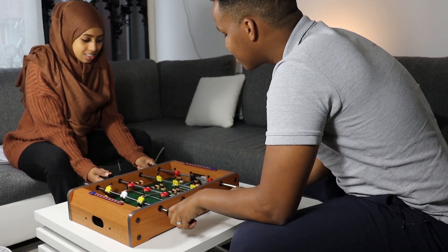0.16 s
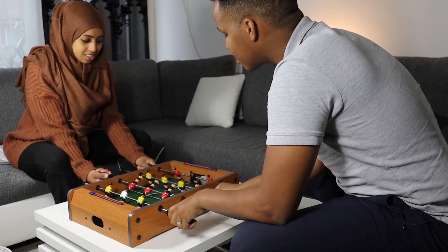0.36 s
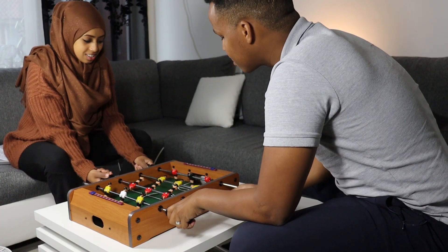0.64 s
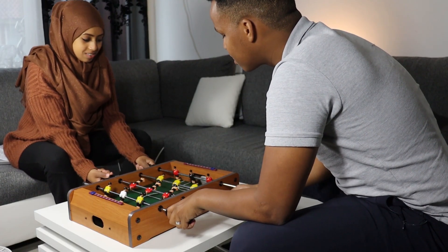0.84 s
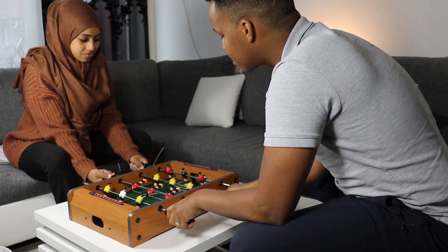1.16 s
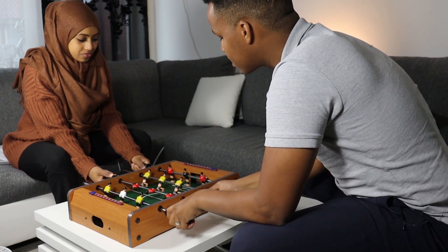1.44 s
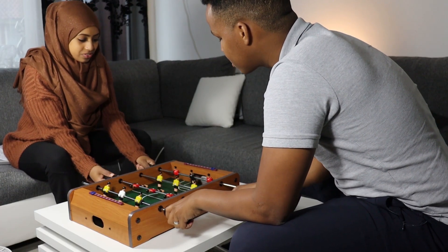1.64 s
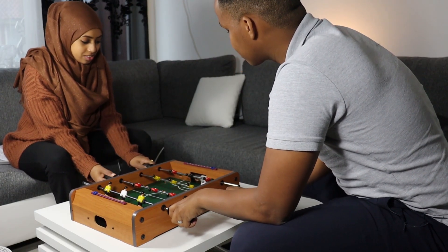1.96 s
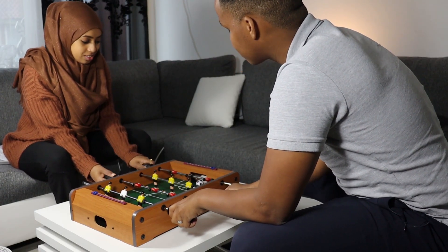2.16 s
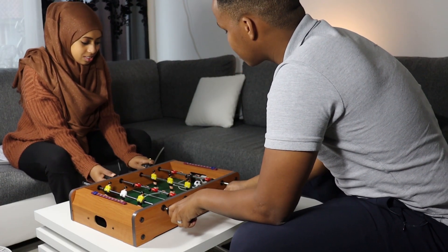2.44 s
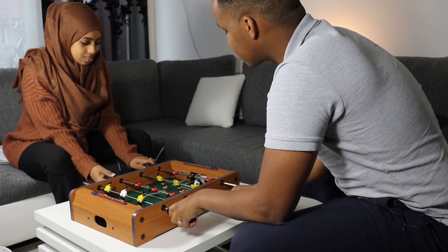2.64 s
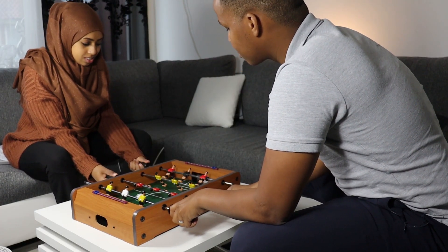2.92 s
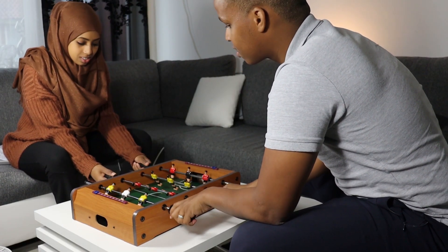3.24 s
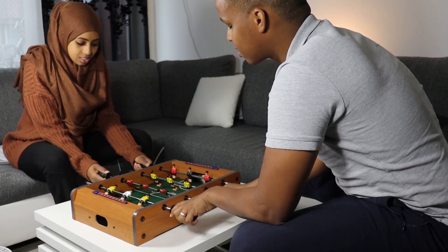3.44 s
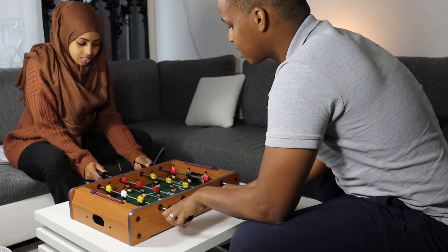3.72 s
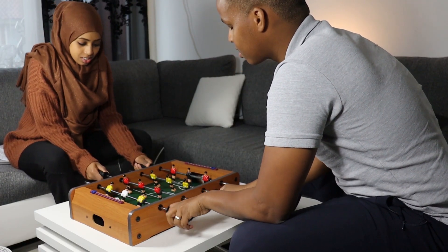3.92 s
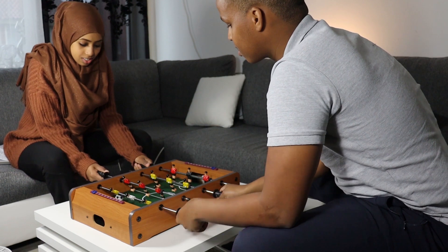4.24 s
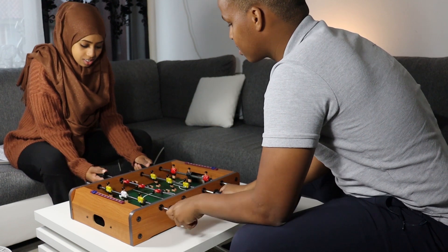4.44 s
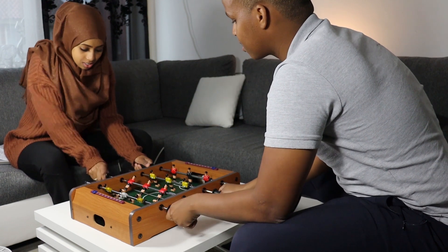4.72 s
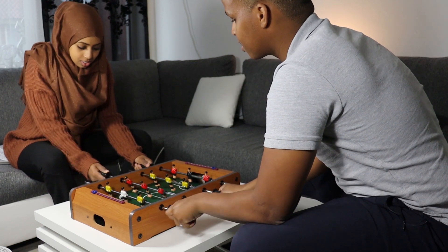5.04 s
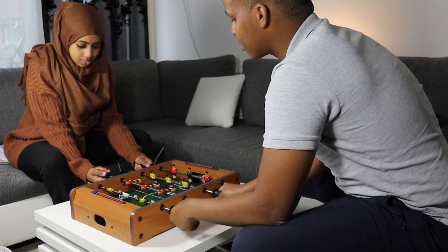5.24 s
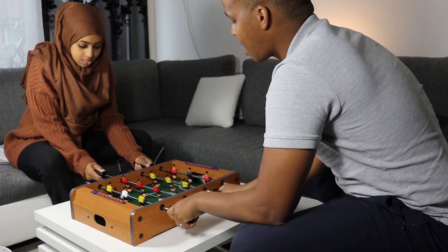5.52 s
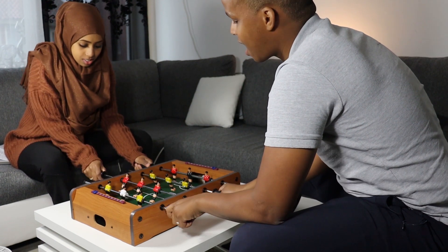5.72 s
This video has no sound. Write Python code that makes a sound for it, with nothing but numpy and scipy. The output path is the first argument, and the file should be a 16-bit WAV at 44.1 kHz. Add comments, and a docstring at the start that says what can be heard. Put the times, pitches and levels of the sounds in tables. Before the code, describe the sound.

Tabletop football played in a furnished living room: hard wooden knocks and clacks, sliding rods, a rattling ball, and long quiet gaps.

```python
"""Furnished living room: a small wooden table-football box on a coffee table, one microphone
a couple of metres off. Ball and rods knock the box, whose modes ring briefly; rods slide and the
ball rolls as dense ticks through the same modes; two rods squeak as gliding tones.
The coffee table rocks as low noise; the room adds a banded noise tail; shaped noise makes
the faint house hum and microphone hiss."""
import sys
import numpy as np
from scipy import signal
from scipy.fft import rfft, irfft
from scipy.io import wavfile

SR = 44100
rng = np.random.default_rng(int(sys.argv[2]) if len(sys.argv) > 2 else 0)


def wav_record(signal):
    """Record a signal, one row per channel, as 16-bit PCM in the file named by sys.argv[1]."""
    frames = np.transpose(np.atleast_2d(signal))
    bounded = np.clip(frames, -1, 1)
    # unit amplitude maps onto the largest positive 16-bit level
    quanta = np.round(bounded * 32767).astype(np.int16)
    wavfile.write(sys.argv[1], SR, quanta)


N = 258728  # samples

# Source levels in the tables are before the balance set in scene().
# Background spectrum: f/Hz, relative density/dB per Hz
AIR_SPECTRUM = [(15, -32), (25, -7), (127, -3), (212, -3.5), (427, -11.5), (503, -11), (1160, -13.5),
                (2000, -19.5), (2910, -15.5), (3160, -19.5), (4490, -21), (14800, -29), (16000, -22.5)]
AIR_LEVEL_DB = -64.5  # rms
# Rumble of the rolling ball and handled rods: t/s, level/dB
ROLLING = [(0, -34.5), (.18, -86), (.42, -57), (.64, -54), (.85, -82.5), (1.06, -58), (1.5, -52.5),
           (1.75, -50), (2.3, -72), (2.66, -56), (2.8, -71.5), (3.55, -57), (3.87, -53.5), (4.2, -61),
           (4.52, -51), (5.15, -57), (5.3, -62), (5.87, -50.5)]
# Rods sliding in their bearings: middle t/s, length/s, rub level/dB, scrape hiss level/dB
SLIDES = [(.03, .2, -47, -74), (.45, .15, -67, -64), (.66, .2, -90, -67), (1.1, .25, -71, -69),
          (1.47, .2, -50.5, -89), (1.83, .12, -43.5, -45.5), (2.2, .2, -48, -83.5), (2.66, .15, -58.5, -64),
          (2.87, .15, -45.5, -49.5), (3.07, .25, -40.5, -59.5), (3.33, .2, -36.5, -72.5),
          (3.72, .2, -59, -59), (4.5, .3, -83.5, -80.5), (5.28, .2, -80.5, -82), (5.83, 0.47, -51.5, -54.5),
          (1.92, .14, -33, -56.5)]
# Loose rods and men rattling on after a blow, in the order rumble, rub, hiss: level re the blow/dB
RATTLE_DB = [-25.5, -27, -38.5]
# Fading time of that rattle, same order: t60/s
RATTLE_T60_S = [0.53, .3, 0.36]
# Blows on the box: t/s, board ring peak level/dB, favoured board f/Hz, favoured upper ring f/Hz,
# then levels re the board ring: table thump/dB, box cavity/dB, upper ring/dB, clack/dB
BLOWS = [(.004, -47, 800, 2280, -12, -12, -2, -21), (0.031, -47, 538, 2420, -16, 4.5, -28, -38),
         (.09, -37, 516, 2990, -24, -7, -4.5, -12), (.441, -55, 490, 2300, -16, 1, -12, -13),
         (0.565, -43, 622, 3310, -16, -11, -8, -21), (.62, -36, 619, 2160, -9, -0.5, -17, -22),
         (.674, -39, 573, 2230, -12, -3, -32, -30), (0.72, -46, 581, 2260, -15, -2.5, -10, -12),
         (1.055, -51.5, 740, 2240, -3.5, 1, -18, -10), (1.082, -54, 530, 3120, -20, -6, -3, -21),
         (1.288, -47, 501, 1940, -8.5, 2, 0, -2), (1.315, -39, 1130, 2510, -24, -12, -1, -14),
         (1.319, -15, 1030, 2357, -32, -10, 2, -15), (1.575, -33, 580, 1880, -12.5, -4.5, -20.5, -28),
         (1.808, -36, 1150, 2400, -15, -8, 7, 3), (1.853, -15.5, 588, 2240, -30.5, -8, -12, -20.5),
         (1.976, -5.5, 1194, 1900, -45.5, -41, -10, -22), (2.006, -28, 960, 1920, -43.5, -35, -0.5, -16),
         (2.216, -38, 797, 2560, -17, -5, -4.5, -15.5), (2.824, -22.5, 864, 2560, -41, -16.5, -7, -20.5),
         (2.843, -22.5, 1400, 2700, -22.5, -10.5, -16.5, -13),
         (2.903, -26.5, 1060, 2770, -18, -4.5, -4, -8), (2.938, -4.5, 594, 1900, -29.5, -11.5, -17.5, -34),
         (2.943, -2.5, 840, 2380, -19, -28.5, -12.5, -26), (3.01, -27.5, 770, 2060, -17, -25, 0, -8),
         (3.08, -23.5, 940, 1920, -21, -11.5, -10, -21), (3.096, -23, 730, 1920, -38.5, -6.5, -12, -34),
         (3.139, -22, 1280, 2110, -24.5, -19, -19, -27), (3.175, -19, 734, 2330, -31.5, -28, -13, -25),
         (3.211, -3.5, 1420, 2900, -39.5, -24, -6, -16.5), (3.624, -45, 805, 2300, -22, -27, -22.5, -19),
         (3.649, -39, 630, 2750, -14.5, -6, -6.5, -22), (3.69, -51, 501, 3300, -35.5, -27, 1, -4),
         (3.707, -34, 633, 2630, -13.5, -8, -3.5, -11.5), (3.739, -38, 727, 3700, -8.5, -6.5, -3, -6),
         (3.871, -44.5, 720, 1970, -40.5, -35, -19, -23), (3.953, -42.5, 729, 2020, -21.5, -15.5, -43, -31),
         (4.075, -38, 756, 2360, -26, -11, -18, -25.5), (4.135, -44.5, 694, 2110, -25, -3, -32, -36.5),
         (4.235, -40.5, 643, 2445, -26, -5.5, -28, -36.5), (4.317, -43.5, 651, 2140, -20.5, -3, -14, -18),
         (4.35, -51, 606, 2500, -5.5, 4.5, -25.5, -27), (4.419, -42, 650, 2140, -22, -1.5, -26, -34),
         (4.473, -50, 530, 4000, -14.5, -10.5, 7, -12), (4.481, -34, 738, 3800, -16, -11, -25, -19),
         (4.57, -38, 730, 2114, -9, -6, -29.5, -27), (4.617, -46.5, 910, 2540, -27.5, -19, 5.5, -9),
         (4.623, -32.5, 676, 2330, -24, -9.5, -26, -26), (4.709, -42.5, 685, 2540, -6, 2, -12.5, -34),
         (4.741, -40.5, 727, 2110, -11, -6, -27, -21), (4.786, -33.5, 1350, 2290, -35, -1, 8.5, 9.5),
         (4.806, -20.5, 1510, 3000, -27, -8, 0.5, -5.5), (4.821, -3, 690, 2360, -23.5, -12.5, -12, -20.5),
         (5.158, -42, 720, 2620, -12, -4, -14.5, -27), (5.227, -53, 649, 2780, 8, -21.5, -10.5, -13.5),
         (5.264, -58.5, 710, 2390, 7, -5, -13, -15), (5.297, -58.5, 525, 2680, 10, -5, -7, -7),
         (5.325, -45.5, 636, 2565, -0.5, -1.5, -14, -19.5), (5.479, -52, 622, 2140, -0.5, 3.5, -10, -15),
         (5.512, -44.5, 624, 3270, -20.5, -14, -2.5, -6), (5.544, -41, 624, 2500, -8.5, -0.5, -6, -26),
         (5.611, -43.5, 660, 2360, -25.5, -27, -7.5, -28), (5.859, -33.5, 670, 2440, -35, -8, -15, -22)]
# Five mode groups, each: f/Hz, relative level/dB, t60/s
# Table thump
THUMP_MODES = [(152.4, -3, 0.13), (218, 4, 0.04), (251.2, 4, 0.07), (318, 16.5, 0.025)]
# Box cavity
CAVITY_MODES = [(395.2, 1.5, 0.037), (400.5, 6, 0.044), (458.8, 4.5, 0.032), (466, -1, 0.027)]
# Board ring
BOARD_MODES = [(594, 2.5, 0.016), (597.3, -8.5, 0.053), (724.6, -3, 0.026), (863, -11, 0.025),
               (969.5, -6, 0.024), (1155, -1, 0.013), (1267, 9.5, 0.007), (1477, 2.5, 0.0067),
               (1503, -3, 0.013), (1557, -1.5, 0.0036)]
# Upper ring
UPPER_MODES = [(2020, -18, 0.005), (2397, 2, 0.017), (2702, 1, 0.011), (3250, -3, 0.0066),
               (3300, -2.5, 0.021), (3397, -16.5, 0.014), (3944, -20, 0.02)]
# Clack
CLACK_MODES = [(4033, -4.5, 0.0073), (4480, -10.8, 0.0038), (5023, 2, 0.013), (5210, 5.5, 0.024),
               (5585, -4.4, 0.009)]
# Harder blows reach lower table modes: blow level/dB, favoured f/Hz
THUMP_SPOT = [(-30, 198), (-12, 150)]
SPOT_SCATTER_DB, SPOT_DETUNE = 2.2, 0.02  # spread of mode level; spread of mode pitch as a fraction
CLACK_HZ, SPOT_OCTAVES = 4730, 0.27  # middle and scatter of the pitch favoured in the clack
CONTACT_CYCLES = 0.65  # build-up of the contact, in cycles of the favoured board pitch
CRACK_DB = -10  # broad crack re upper ring
CLICK_DB, SPRAY_DB = 0.5, -19.5  # click and its highest part, re clack
# Room tail by band: f/Hz, relative level/dB, t60/s
ROOM_BANDS = [(173, -5, 0.32), (375, -23.5, 0.21), (635, -8.5, 0.37), (1330, -10.5, 0.42),
              (2725, -15.5, 0.5), (5150, -10.5, 0.42), (8000, -13.5, 0.29), (11500, -32.5, .3)]
# Coffee table rocking on its legs: t at which the swell is full/s, hold length/s, level/dB
SWAYS = [(.66, .12, -71), (.96, 0.042, -78), (1.4, 0.046, -81), (1.6, 0.11, -68), (1.946, 0.073, -73),
         (2.977, 0.18, -54), (4.863, 0.19, -57), (5.15, 0.057, -65), (5.82, .1, -77)]
SWAY_HZ, SWAY_WIDTH_HZ = 39.5, 8.8
SWAY_ATTACK_S, SWAY_T60_S, SWAY_REST_DB = 0.05, 0.2, -80
# Rods squeaking through their bearings: start t/s, length/s, level/dB, first f/Hz, last f/Hz
SQUEAKS = [(2.586, 0.1, -59, 915, 1551), (5.639, .28, -52.5, 1660, 1409)]
TOP_HZ = 15900  # upper edge of the recorder


def undb(db):
    """Decibels to gain."""
    return 10 ** (np.asarray(db) / 20)


def unit(x):
    """Scale to rms 1."""
    return x / np.sqrt(np.mean(x ** 2))


def peak_unit(x):
    """Scale to peak 1."""
    return x / np.abs(x).max()


def band(x, hz, width_hz, order=1):
    """Band-pass with hz as the geometric middle of its edges."""
    lo = np.sqrt(hz ** 2 + width_hz ** 2 / 4) - width_hz / 2
    hi = min(lo + width_hz, 0.45 * SR)
    return signal.sosfilt(signal.butter(order, [lo, hi], "band", fs=SR, output="sos"), x)


def hump(start_s, length_s):
    """Speed of one stroke: half a sine from rest to 1 and back."""
    return np.sin(np.pi * np.clip((np.arange(N) / SR - start_s) / length_s, 0, 1))


def air():
    """Steady house hum and microphone hiss: noise weighted along a spectrum."""
    hz, db = np.transpose(AIR_SPECTRUM)
    f = np.maximum(np.arange(N // 2 + 1) * SR / N, 1)
    weight = undb(np.interp(np.log(f), np.log(hz), db))
    noise = irfft(rfft(rng.standard_normal(N)) * weight, N)
    return undb(AIR_LEVEL_DB) * unit(noise)


def grains(rate, spread_db):
    """Micro-impacts: random ticks at a mean rate per second, most of them small."""
    chance, sign, size = rng.random((3, N))
    return (chance < rate / SR) * np.sign(sign - 0.5) * undb(-spread_db * np.log(1 - size))


def through(x, modes):
    """Modes as resonators; soft rolling contacts feed little far outside their range."""
    lo, hi = modes[0][0], modes[-1][0]
    soft = band(x, np.sqrt(lo * hi), 2.2 * hi - 1.8 * lo, order=3)
    return unit(sum(undb(db) * band(soft, hz, 3.4 / t60) for hz, db, t60 in modes))


def rattle(db, t60):
    """Gain of loose rods and men: jumps with every blow, then fades exponentially."""
    jolts = np.zeros(N)
    s, peak_db = np.transpose(BLOWS)[:2]
    jolts[(s * SR).astype(int)] = undb(peak_db + db)
    return signal.lfilter([1], [1, -undb(-60 / t60 / SR)], jolts)


def motion():
    """Rods and ball moving: dense uneven micro-impacts ring the same box modes as the blows."""
    rumble_rattle, rub_rattle, hiss_rattle = [rattle(db, t60) for db, t60 in zip(RATTLE_DB, RATTLE_T60_S)]
    s, db = np.transpose(ROLLING)
    rumble_gain = undb(np.interp(np.arange(N) / SR, s, db)) + rumble_rattle
    rub_gain, hiss_gain = rub_rattle, hiss_rattle
    for middle_s, length_s, rub_db, hiss_db in SLIDES:
        stroke = hump(middle_s - length_s / 2, length_s) ** 2
        rub_gain = rub_gain + stroke * undb(rub_db)
        hiss_gain = hiss_gain + stroke * undb(hiss_db)

    rumble = through(grains(540, 2.11), CAVITY_MODES)
    rumble = rumble + undb(-0.5) * through(grains(600, 2.9), BOARD_MODES[:5])
    rub = through(grains(1500, 0.83), BOARD_MODES[5:])
    scrape = grains(7500, 1.4)
    hiss = through(scrape, UPPER_MODES + CLACK_MODES) + unit(band(scrape, 5900, 7000, order=2))
    return rumble_gain * unit(rumble) + rub_gain * rub + hiss_gain * unit(hiss)


def ring(modes, chance, grit, spot_hz, focus_db, rattle_db, rise_s):
    """One group of decaying modes, weighted by the struck spot, with a rattle of loose parts; peak 1."""
    t = np.arange(len(grit)) / SR
    hz, db, t60 = (c[:, None] for c in np.transpose(modes))
    size, detune = (c[:len(modes), None] for c in chance)
    # each mode loses focus_db per octave away from the favoured pitch
    gain = undb(db + SPOT_SCATTER_DB * size - focus_db * np.abs(np.log2(hz / spot_hz)))
    # neighbouring modes move in opposite sense, which fills the valleys between them
    gain = gain * (-1) ** np.arange(len(modes))[:, None]
    tones = np.sin(2 * np.pi * hz * (1 + SPOT_DETUNE * detune) * t)
    ringing = np.sum(gain * undb(-60 * t / t60) * tones, axis=0)

    lo, hi = hz.min(), hz.max()
    middle_hz = np.sqrt(lo * hi)
    loose = unit(band(grit, middle_hz, hi - lo, order=2)) * undb(rattle_db - 60 * t / 0.057)
    # the contact takes time to build
    built = (peak_unit(ringing) + loose) * (1 - np.exp(-(t / rise_s) ** 2))
    # the group radiates little outside its own range
    return peak_unit(band(built, middle_hz, 1.31 * hi - 0.55 * lo, order=3))


def blows():
    """Knocks of ball and rods: each rings five groups of modes and adds a crack, click and spray."""
    out = np.zeros(N + SR)
    chances = rng.standard_normal((len(BLOWS), 5, 2, len(BOARD_MODES)))
    clack_spots = CLACK_HZ * 2 ** (SPOT_OCTAVES * rng.standard_normal(len(BLOWS)))
    grits = rng.standard_normal((len(BLOWS), int(0.12 * SR)))
    t = np.arange(grits.shape[1]) / SR
    crack = peak_unit(band(1.0 * (t == 0), 1900, 3500, order=2))  # a filtered impulse
    fade = np.cos(np.pi / 2 * t / t[-1])

    for blow, chance, clack_hz, grit in zip(BLOWS, chances, clack_spots, grits):
        s, db, board_hz, upper_hz, thump_db, cavity_db, upper_db, clack_db = blow
        rise_s = CONTACT_CYCLES / board_hz
        thump_hz = np.interp(db, *np.transpose(THUMP_SPOT))
        board = ring(BOARD_MODES, chance[0], grit, board_hz, 16, -16.5, rise_s)
        thump = ring(THUMP_MODES, chance[1], grit, thump_hz, 8, -29.5, rise_s + 0.001)
        cavity = ring(CAVITY_MODES, chance[2], grit, 400, 0, -21.5, rise_s + 0.00057)
        upper = ring(UPPER_MODES, chance[3], grit, upper_hz, 36, -7, 0.36 * rise_s)
        clack = ring(CLACK_MODES, chance[4], grit, clack_hz, 24, -4, 0.8 * rise_s)
        # sharp onset with a weak longer tail
        click_decay = np.exp(-t / 0.002) + 0.045 * np.exp(-t / 0.043)
        click = peak_unit(band(grit * click_decay, 6600, 4200, order=2))
        spray = peak_unit(band(grit * undb(-60 * t / 0.03), 9190, 5100, order=3))

        hit = board + undb(thump_db) * thump + undb(cavity_db) * cavity
        hit = hit + undb(upper_db) * (upper + undb(CRACK_DB) * crack)
        hit = hit + undb(clack_db) * (clack + undb(CLICK_DB) * click + undb(SPRAY_DB) * spray)
        at = int(s * SR)
        out[at:at + len(hit)] += undb(db) * hit * fade
    return out[:N]


def room(x):
    """Direct sound, then a diffuse tail that builds in a few ms and fades band by band."""
    t = np.arange(int(0.7 * SR)) / SR
    tail = 0
    for hz, db, t60 in ROOM_BANDS:
        noise = band(rng.standard_normal(len(t)), hz, 0.94 * hz, order=2)
        tail = tail + undb(db - 60 * t / t60) * noise
    tail = undb(-22.5) * tail * (1 - np.exp(-(t / 0.0074) ** 2))
    return x + signal.fftconvolve(x, tail)[:N]


def sway():
    """Low rocking of the coffee table: narrow noise that swells, holds and dies away."""
    t, gain = np.arange(N) / SR, undb(SWAY_REST_DB)
    for full_s, hold_s, db in SWAYS:
        swell = np.clip((t - full_s) / SWAY_ATTACK_S + 1, 0, 1) ** 2
        after_s = np.maximum(t - full_s - hold_s, 0)
        gain = gain + swell * undb(db - 60 * after_s / SWAY_T60_S)
    return gain * unit(band(rng.standard_normal(N), SWAY_HZ, SWAY_WIDTH_HZ, order=2))


def squeaks():
    """Rods squeaking in their bearings: a gliding tone roughened by low noise, swelling and fading."""
    out, t = 0, np.arange(N) / SR
    for s, length_s, db, first_hz, last_hz in SQUEAKS:
        rough = unit(band(rng.standard_normal(N), 65, 120, order=2))
        glide_hz = np.interp(t, [s, s + length_s], [first_hz, last_hz])
        tone = np.sin(2 * np.pi * np.cumsum(glide_hz) / SR)
        out = out + undb(db) * hump(s, length_s) * rough * tone
    return out


def scene():
    """Blows, motion and squeaks reach the microphone through the room; sway and air are added dry."""
    on_table = undb(1.0) * blows() + undb(-7.5) * motion() + squeaks()
    return (room(on_table) + sway() + air())[None]


def record(dry):
    """The recorder rounds the loudest peaks and cuts the top."""
    rounded = dry / (1 + dry ** 8) ** (1 / 8)
    return signal.sosfilt(signal.ellip(10, 0.2, 60, TOP_HZ, fs=SR, output="sos"), rounded)


dry = scene()
out = record(dry)
wav_record(out)
```